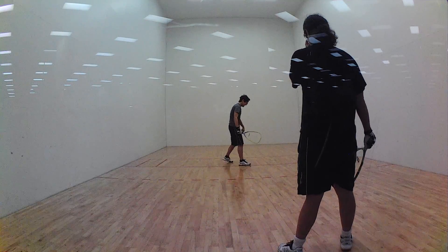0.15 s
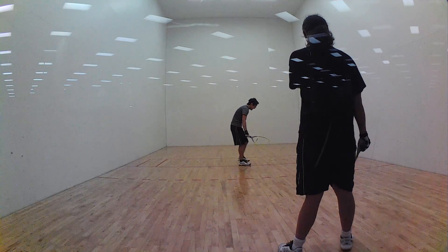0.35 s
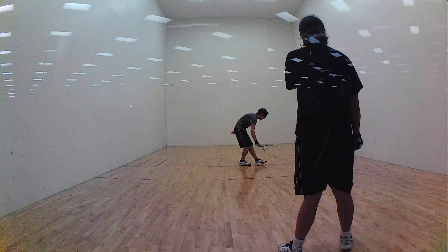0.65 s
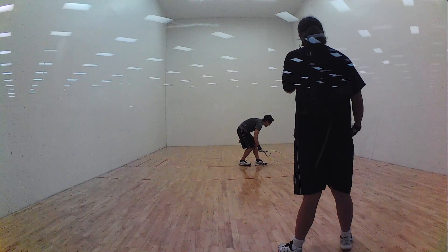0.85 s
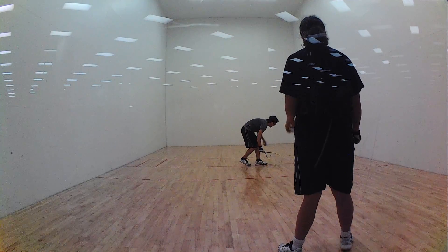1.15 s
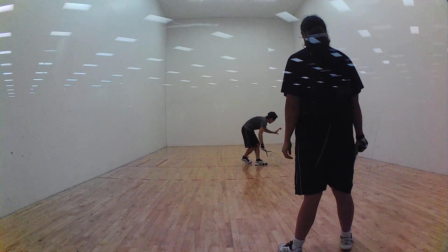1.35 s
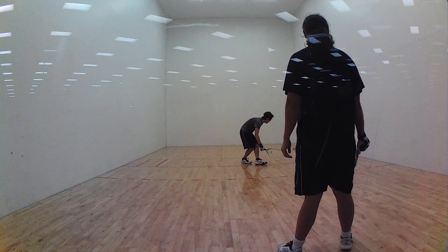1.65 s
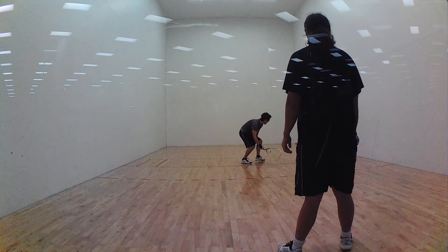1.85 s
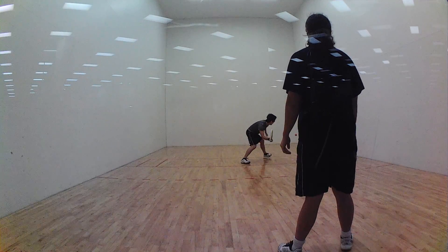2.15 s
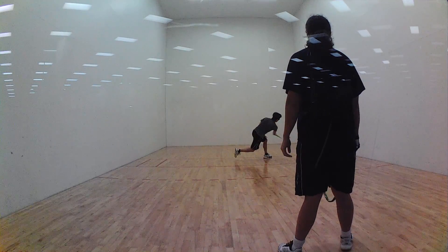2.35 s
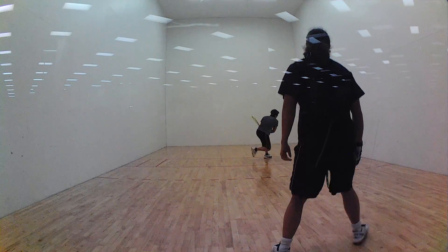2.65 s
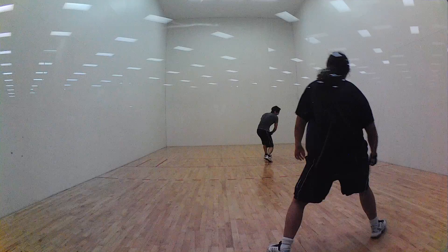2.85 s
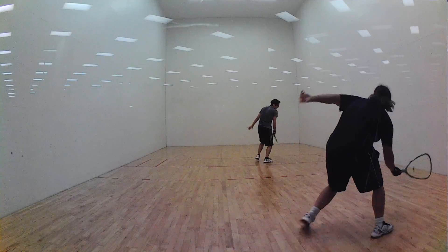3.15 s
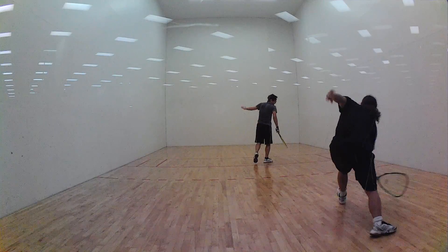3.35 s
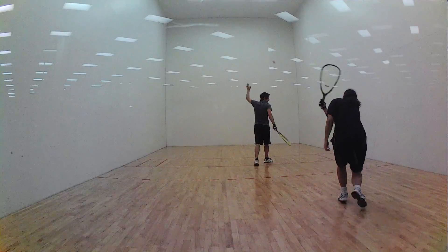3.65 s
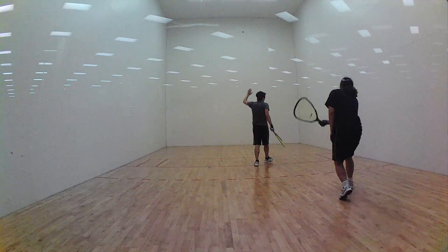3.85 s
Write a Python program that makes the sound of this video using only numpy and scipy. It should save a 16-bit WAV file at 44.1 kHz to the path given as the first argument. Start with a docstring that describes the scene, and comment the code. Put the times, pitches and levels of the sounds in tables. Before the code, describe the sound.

Over a low room hum, shoes thud and scuff, a ball bounces, then a racquet smacks it hard. Rapid hollow wall hits and small metallic clinks blur into long reverberation, in slightly overloaded distant mono.

```python
"""A hollow ball rings off wall and floor, as a sum of decaying modes, during a serve on a racquetball court.
It is bounced first, each impact a filtered click, and then struck with a thump and crack of the strings.
Shoes thud, scuff as filtered random slips and squeak as wavering tones; a metal part clinks in high modes.
A fan tone and faint whine stand in shaped background noise; echoes of the hard room last for seconds."""
import sys
import numpy as np
from scipy import signal
from scipy.fft import rfft, irfft
from scipy.io import wavfile
from scipy.ndimage import uniform_filter1d

SR = 44100
rng = np.random.default_rng(int(sys.argv[2]) if len(sys.argv) > 2 else 0)


def int16_out(signal):
    """Quantize to a 16-bit WAV file."""
    q = np.round(np.clip(np.atleast_2d(signal).T, -1, 1) * 32767)
    wavfile.write(sys.argv[1], SR, q.astype(np.int16))


N = 176400

# Background noise, relative spectrum with a gap between 2.3 and 3 kHz: [f/Hz, level/dB]
BACKGROUND_SPECTRUM = [(20, -7.5), (40, 1.5), (56, -1.5), (80, -1.5), (120, -3), (220, 3), (310, 1.5),
                       (500, -2.5), (750, -5.5), (1200, -4), (1600, -5), (1980, -4.5), (2330, -48.5),
                       (2980, -84), (3250, -18), (4400, -23), (6500, -30.5), (8200, -30), (9600, -44)]
# Swell of the fan tone: [t/s, level/dB]
FAN_TONE_LEVEL = [(0, -52.5), (.3, -46), (.55, -46.5), (.82, -55), (.97, -51.5), (1.05, -44.5), (1.4, -43),
                  (1.65, -47), (2.0, -41.5), (2.25, -45), (2.4, -53), (3.1, -45.5), (3.6, -55),
                  (3.8, -49.5), (4, -44)]
BACKGROUND_DB, FAN_TONE_HZ = -45, 386.8
WHINE_HZ, WHINE_DB = 3487, -70.5

# Metallic clinks: [t/s, level/dB]
CLINK_EVENTS = [(3.082, -12), (3.115, -16), (3.241, -20.5)]
# Modes of the small metal part: [f/Hz, relative level/dB, t60/s]
METAL_MODES = [(6760, -6, 0.033), (7060, -9, .03), (7270, -6.5, 0.024), (7480, -6, .03), (7768, -14, 0.05)]
# Spectrum of the contact tick of the metal: [f/Hz, relative level/dB]
METAL_TICK_SPECTRUM = [(300, -5.5), (1500, 17.5), (2600, 5.5), (3300, 9), (4500, 1.5), (7000, -8.5),
                       (9500, -11.5)]
METAL_RING_DB = -16  # relative to the tick

# Footfalls: [t/s, level/dB]
FOOTFALLS = [(0.659, -10.5), (.775, -2.5), (1.335, -25), (1.951, -20), (2.44, -3), (2.78, -0.5), (3.0, -4),
             (3.512, 1.5)]
# Spectrum of a footfall: [f/Hz, relative level/dB]
FOOTFALL_SPECTRUM = [(30, -25.5), (70, 12), (130, 9), (240, 15), (450, 1), (900, 3), (2200, -18.5),
                     (6000, -54.5)]
# Shoe scuffs: [t/s, length/s, level/dB]
SCUFF_EVENTS = [(0.522, 0.027, -23.5), (0.778, 0.13, -15), (1.351, 0.009, -33.5), (1.72, 0.026, -30),
                (2.247, 0.093, -20), (2.423, 0.12, -18.5)]
# Spectrum of one slip of the sole: [f/Hz, relative level/dB]
SLIP_SPECTRUM = [(100, 1.5), (600, 13.5), (1800, 15.5), (2600, -4.5), (3500, 6.5), (6500, -6.5),
                 (9500, -19)]
# Squeaks and groans of rubber soles: [t/s, length/s, f/Hz, level/dB]
SQUEAK_EVENTS = [(1.35, 0.11, 408.3, -17.5), (2.31, .13, 1580, -20.5)]

# Spectrum of the ready bounce on the boards: [f/Hz, relative level/dB]
BOUNCE_SPECTRUM = [(50, -5), (120, -3), (220, 15), (400, 8), (750, 4.5), (1150, 1.5), (1900, -4),
                   (3200, -40), (8000, -48.5)]
# Modes of the sprung floor under the bounce: [f/Hz, level/dB, t60/s]
FLOOR_MODES = [(88.6, -46, 0.45), (163, -50.5, 0.63), (203, -53, 0.64), (255, -40.5, 0.59),
               (316, -43, 0.19), (321, -44, 0.15)]
# Spectrum of the sharp knock of the boards: [f/Hz, relative level/dB]
KNOCK_SPECTRUM = [(100, -4), (600, -13.5), (1000, 4.5), (1350, 9), (2000, -2.5), (2600, -19.5), (3300, -16),
                  (8000, -48)]
BOUNCE_S, BOUNCE_DB = 0.858, -4
KNOCK_DELAY_S, KNOCK_DB = 0.0075, -2

# Spectrum of the racquet's crack: [f/Hz, relative level/dB]
CRACK_SPECTRUM = [(15, -22.5), (40, -21), (90, 1), (230, 8.5), (400, -1), (750, -3.5), (1400, 0),
                  (2100, -3.5), (3500, -16), (6500, -25), (9500, -38.5)]
# Modes of the string bed and frame: [f/Hz, relative level/dB, t60/s]
RACQUET_MODES = [(232, -19, 0.014), (265, -28, 0.0084), (394, -27, 0.04)]
STROKE_S, CRACK_DB = 2.568, 12

# Ball contacts with floor and walls:
# [t/s, level/dB, tilt/(dB per kHz), direct level/dB, echo build-up time constant/s]
BALL_CONTACTS = [(2.458, 5, -2, -28, .03), (2.620, 8, 29.5, -5, .01), (2.664, 6.5, 25, -4, .006),
                 (2.710, 6.5, -1, -2, .01), (2.962, -5.5, -5, -6, .01), (3.008, 3.5, -1.5, -8.5, .01),
                 (3.505, 4, 2, -10.5, .015)]
# Modes of the hollow ball: [f/Hz, relative level/dB, t60/s]
BALL_MODES = [(888.4, -2, 0.031), (944, 2, 0.036), (1039, 0, 0.034), (1177, -6, 0.063), (1260, -11, 0.11)]
# Spectrum of the rubber slap at each contact: [f/Hz, relative level/dB]
SLAP_SPECTRUM = [(60, -21.5), (200, 7), (500, -4), (900, 1.5), (1700, 1.5), (2200, -8.5), (3200, -42),
                 (8000, -44.5)]
# Spectrum of the tick of the ball on the front wall: [f/Hz, relative level/dB]
WALL_TICK_SPECTRUM = [(500, -8), (3100, -15), (3800, 1.5), (4400, -21), (8000, -31.5)]
SLAP_DB = -11.5  # relative to the ringing ball
WALL_TICK_S, WALL_TICK_DB = 2.672, -14

# Late reverberation of the court: [f/Hz, t60/s]
COURT_DECAY = [(60, 1.5), (200, 1.94), (500, 4.8), (1100, 4.1), (2000, 2.56), (4000, 2.53), (8000, 1.4)]
# First reflections: [delay/s, gain relative to the direct sound]
FIRST_REFLECTIONS = [(.0035, 0.33), (.0058, .7), (.0088, 0.9), (0.0105, 1), (.016, .5), (.0235, 0.19),
                     (.031, 0.22)]
EARLY_T60_S, CLUMPING_DB = 0.77, 1.3  # clumping is the rms variation of echo level

# Overall tone of the sound, with narrow dips near 2.7 and 5 kHz: [f/Hz, gain/dB]
OVERALL_TONE = [(10, -14.5), (30, -11), (55, -2), (2050, 1), (2250, 4.5), (2520, -29.5), (2650, -7),
                (2830, -33.5), (3080, -1), (4500, -2.5), (4800, -54), (5300, -49.5), (5600, -0.5),
                (10000, -1.5)]
BAND_EDGE_HZ = 9600


def amp(db):
    """Level as a logarithm: 20 dB is a factor of ten in amplitude."""
    return 10 ** (np.asarray(db) / 20)


def unit(x):
    """Energy normalisation: the squared samples sum to one."""
    return x / np.sqrt(np.sum(x ** 2) + 1e-20)


def read(points, hz):
    """Linear interpolation of a table on a logarithmic frequency axis."""
    f, value = np.transpose(points)
    return np.interp(np.log(hz + 1), np.log(np.sort(f) + 1), value)


def add(mix, s, sound):
    """Superposition: the pressure of a sound adds to the mix from time s in seconds."""
    part = mix[round(s * SR):][:len(sound)]
    part += sound[:len(part)]


def colour(x, points):
    """Linear filtering: the spectrum is multiplied by a tabulated gain, with no phase shift."""
    gain = amp(read(points, np.fft.rfftfreq(len(x), 1 / SR)))
    return irfft(rfft(x) * gain, len(x))


def click(points, size=4096):
    """Minimum phase: the Hilbert transform of the log gain makes the impulse response causal."""
    hz = abs(np.fft.fftfreq(size, 1 / SR))
    log_gain = np.log(amp(read(points, hz)))
    spectrum = np.exp(np.conj(signal.hilbert(log_gain)))
    return unit(np.fft.ifft(spectrum).real[:size // 2])


def ring(modes, tilt_db_per_khz=0):
    """Modal superposition: a struck body sounds as exponentially decaying sines of alternating sign."""
    t = np.arange(SR // 4) / SR
    out = np.zeros(len(t))
    for k, (hz, db, t60) in enumerate(modes):
        envelope = amp(db + tilt_db_per_khz * hz / 1000 - 60 * t / t60)
        out += (-1) ** k * envelope * np.sin(2 * np.pi * hz * t)
    return out


def wander(hz):
    """Low-passed noise: random motion of unit rms, its spectrum falling to 1/e at hz."""
    f = np.fft.rfftfreq(N, 1 / SR)
    slow = irfft(rfft(rng.standard_normal(N)) * np.exp(-(f / hz) ** 2), N)
    return unit(slow) * np.sqrt(N)


def scatter(size=8):
    """Diffuse reflection: dense echoes, one of random sign and place in each slot of samples."""
    taps = np.zeros(N)
    at = np.arange(0, N - size, size)
    taps[at + rng.integers(0, size, len(at))] = rng.choice([-1., 1.], len(at))
    return taps


def court(x, direct_db, early_db, late_db, build_s=0.0048):
    """Room convolution: direct sound and first reflections, a quick wash and a long tail in clumps."""
    t = np.arange(N) / SR
    first = np.zeros(N)
    first[0] = 1
    for delay, gain in FIRST_REFLECTIONS:
        first[round(delay * SR)] += gain
    build = 1 - np.exp(-t / build_s)
    echoes = scatter() * amp(CLUMPING_DB * wander(hz=50))
    early = scatter() * build * amp(CLUMPING_DB * wander(hz=90) - 60 * t / EARLY_T60_S)
    # each frequency of the tail decays at its own rate
    hz, times, z = signal.stft(echoes, SR, nperseg=512)
    decay = amp(-60 * times / read(COURT_DECAY, hz)[:, None])
    late = signal.istft(z * decay, SR)[1][:N] * build
    # the tail is scaled by the energy of one with the decay at 1 kHz
    late /= np.linalg.norm(build * amp(-60 * t / read(COURT_DECAY, 1000)) * echoes)
    response = amp(direct_db) * unit(first) + amp(early_db) * unit(early) + amp(late_db) * late
    return signal.fftconvolve(x, response)[:N]


def background(waver_db=1.02):
    """Broadband and tonal noise: wavering noise, a fan tone that swells and fades, a faint whine."""
    t = np.arange(N) / SR
    noise = unit(colour(rng.standard_normal(N), BACKGROUND_SPECTRUM)) * np.sqrt(N)
    noise *= amp(BACKGROUND_DB + waver_db * wander(hz=9.5))
    tone = np.sin(2 * np.pi * FAN_TONE_HZ * t + 0.14 * wander(hz=4))  # phase wander in radians
    tone *= amp(np.interp(t, *np.transpose(FAN_TONE_LEVEL)))
    whine = np.sin(2 * np.pi * WHINE_HZ * t + wander(hz=14)) * amp(WHINE_DB)
    return noise + np.sqrt(2) * (tone + whine)  # a sine's peak is root two times its rms


def clinks():
    """Impact excitation: a small metal part ticks on contact and rings in its high modes."""
    out = np.zeros(N)
    clink = amp(METAL_RING_DB) * unit(ring(METAL_MODES))
    add(clink, 0, click(METAL_TICK_SPECTRUM))
    for s, db in CLINK_EVENTS:
        add(out, s, amp(db) * court(clink, direct_db=-0.5, early_db=-6.5, late_db=5))
    return out


def footfalls():
    """Impulsive excitation: each sole thuds on the sprung floor as a filtered click."""
    out = np.zeros(N)
    for s, db in FOOTFALLS:
        thud = click(FOOTFALL_SPECTRUM)
        add(out, s, amp(db) * court(thud, direct_db=-11, early_db=-12.5, late_db=-1))
    return out


def scuffs():
    """Sliding friction: a run of random tiny slips, each filtered by the sole's spectrum."""
    out = np.zeros(N)
    for s, length, db in SCUFF_EVENTS:
        count = round(length * SR)
        slips = rng.laplace(size=count) * signal.windows.tukey(count)
        scuff = unit(signal.fftconvolve(slips, click(SLIP_SPECTRUM)))
        add(out, s, amp(db) * court(scuff, direct_db=4.5, early_db=-3, late_db=-12.5))
    return out


def squeaks():
    """Frequency modulation: a sole's tone wavers randomly in pitch while it swells and fades."""
    out = np.zeros(N)
    for s, length, hz, db in SQUEAK_EVENTS:
        count = round(length * SR)
        jitter = 0.013 * uniform_filter1d(rng.standard_normal(count), size=60)
        turns = np.cumsum(hz * (1 + jitter)) / SR
        squeak = unit(np.sin(2 * np.pi * turns) * np.hanning(count))
        add(out, s, amp(db) * court(squeak, direct_db=10.5, early_db=4, late_db=0))
    return out


def bounce(knock_t60_s=0.19):
    """Impact on a flexible floor: the ball slaps it, its modes boom and a noisy hard knock follows."""
    out = np.zeros(N)
    slap = court(click(BOUNCE_SPECTRUM), direct_db=-12, early_db=7.5, late_db=-17)
    add(out, BOUNCE_S, amp(BOUNCE_DB) * slap)
    add(out, BOUNCE_S, ring(FLOOR_MODES))
    t = np.arange(SR // 8) / SR
    burst = rng.standard_normal(len(t)) * amp(-60 * t / knock_t60_s)
    knock = unit(signal.fftconvolve(burst, click(KNOCK_SPECTRUM)))
    add(out, BOUNCE_S + KNOCK_DELAY_S, amp(KNOCK_DB) * knock)
    return out


def stroke():
    """Impact on a damped membrane: the string bed thumps in brief modes as the ball cracks off it."""
    out = np.zeros(N)
    crack = court(click(CRACK_SPECTRUM), direct_db=-15.5, early_db=-5, late_db=-2)
    add(out, STROKE_S, amp(CRACK_DB) * crack)
    add(out, STROKE_S, court(ring(RACQUET_MODES), direct_db=14.5, early_db=6.5, late_db=-1))
    return out


def ball():
    """Shell resonance: each contact slaps and rings the hollow ball; the front wall adds a tick."""
    out = np.zeros(N)
    for s, db, tilt, direct, build in BALL_CONTACTS:
        contact = unit(ring(BALL_MODES, tilt))
        add(contact, 0, amp(SLAP_DB) * click(SLAP_SPECTRUM))
        heard = court(contact, direct_db=direct, early_db=-8.5, late_db=0, build_s=build)
        add(out, s, amp(db) * heard)
    add(out, WALL_TICK_S, amp(WALL_TICK_DB) * click(WALL_TICK_SPECTRUM))
    return out


def scene():
    """Superposition of all sources on the court, in mono."""
    shoes = footfalls() + scuffs() + squeaks()
    return (background() + clinks() + shoes + bounce() + stroke() + ball())[None]


def record(dry, threshold_db=-24, envelope_fall_db_per_s=40, ceiling=0.25):
    """Dynamic compression, then soft overload, the overall tone and a band limit."""
    power_db = 10 * np.log10(abs(uniform_filter1d(dry[0] ** 2, size=400)) + 1e-12)
    # the envelope follows each peak at once, then falls at a steady rate
    fall = np.arange(N) * envelope_fall_db_per_s / SR
    envelope_db = np.maximum.accumulate(power_db + fall) - fall
    over_db = np.maximum(envelope_db - threshold_db, 0)
    # 0.36 dB of reduction for each dB over the threshold
    held = dry[0] / amp(0.36 * uniform_filter1d(over_db, size=200))
    overloaded = ceiling * np.tanh(held / ceiling)
    heard = colour(overloaded, OVERALL_TONE)
    low_pass = signal.firwin(401, BAND_EDGE_HZ, window=("kaiser", 9), fs=SR)
    return signal.oaconvolve(heard, low_pass, "same")[None]


dry = scene()
out = record(dry)
int16_out(out)
```